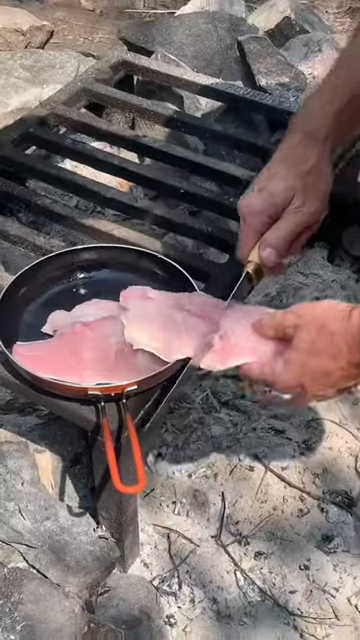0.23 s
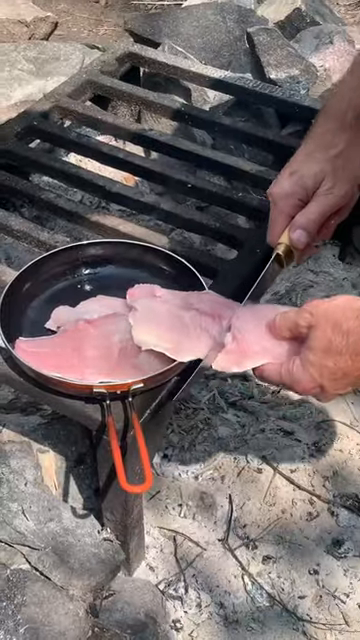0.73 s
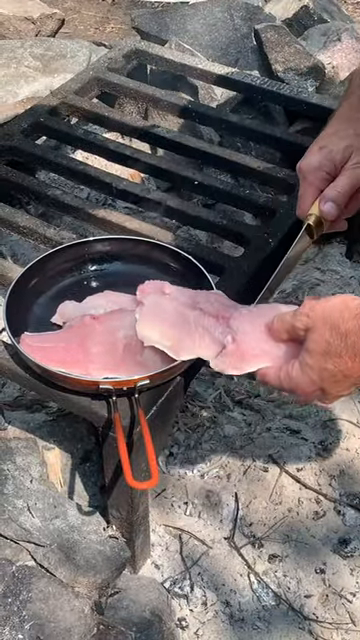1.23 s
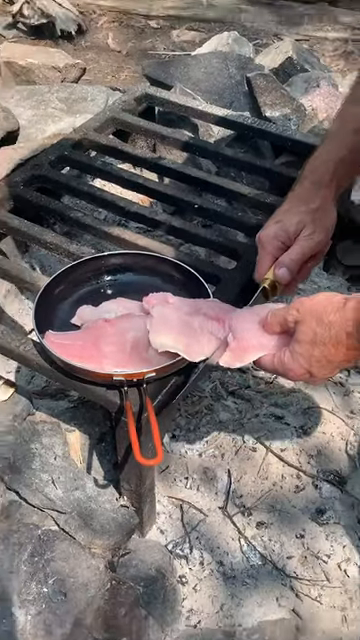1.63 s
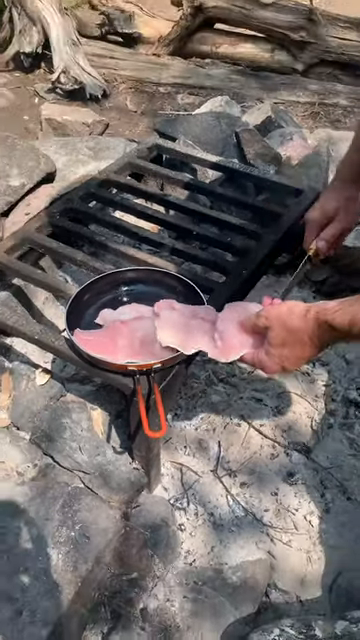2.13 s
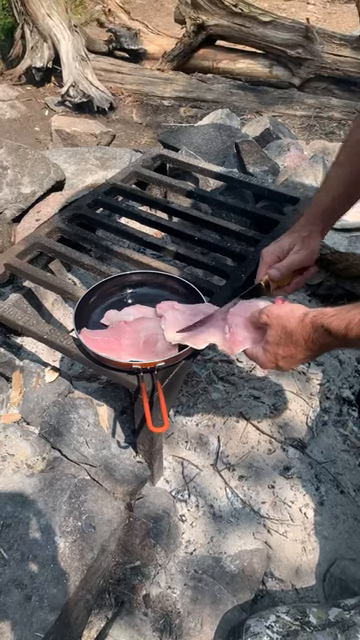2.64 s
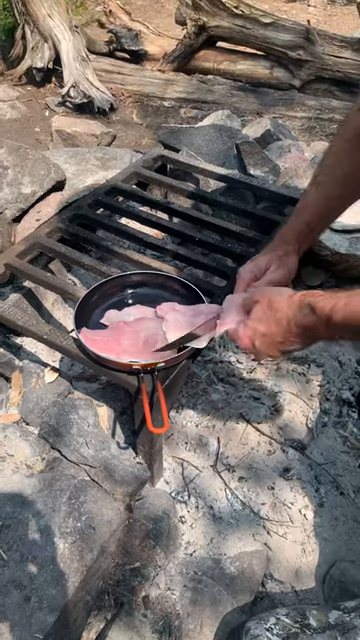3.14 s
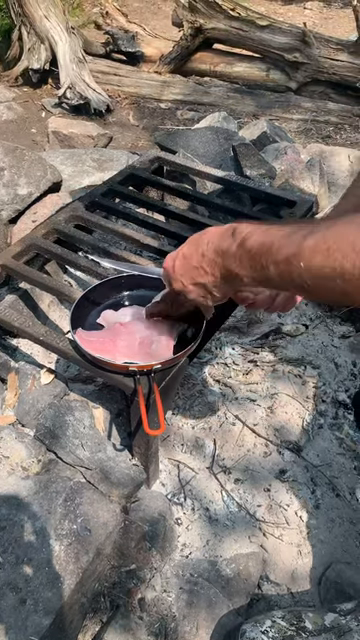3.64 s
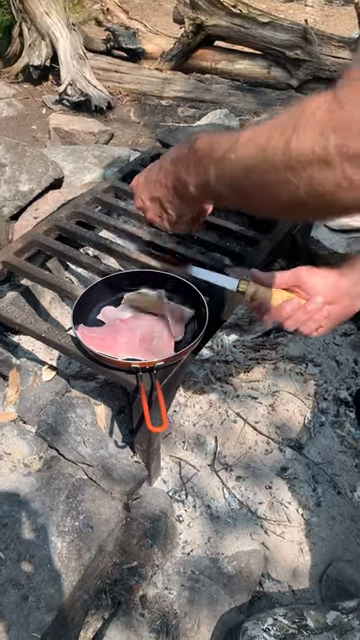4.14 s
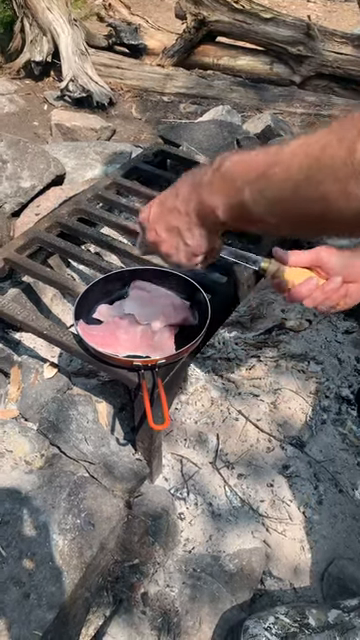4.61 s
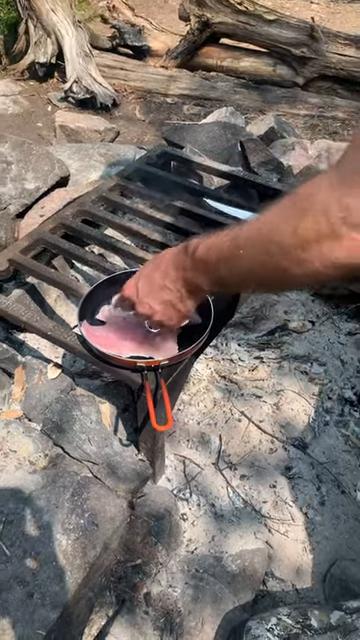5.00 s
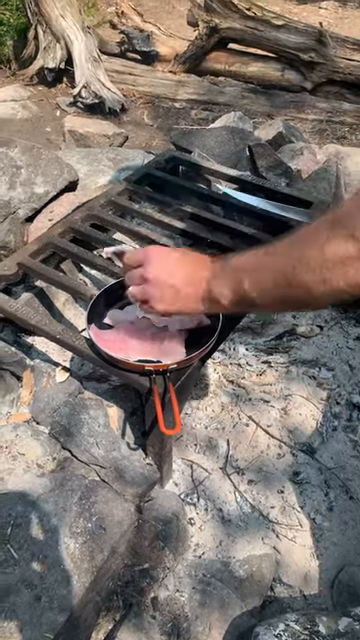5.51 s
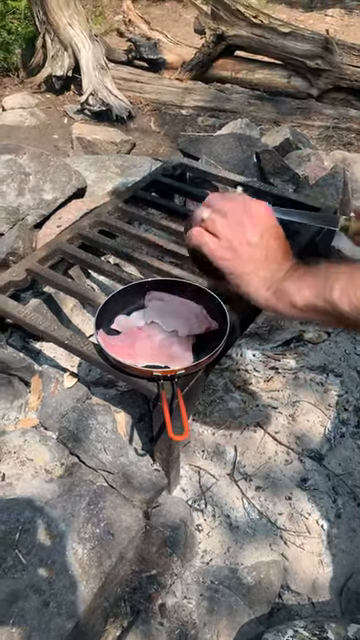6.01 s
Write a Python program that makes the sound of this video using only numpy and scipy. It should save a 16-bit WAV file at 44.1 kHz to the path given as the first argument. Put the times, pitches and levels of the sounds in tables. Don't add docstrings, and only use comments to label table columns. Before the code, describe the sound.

A split second of windy water lapping, then a metal pan clanks and rings on an iron grate while songbirds whistle among trees.

```python
import sys
import numpy as np
from scipy import signal
from scipy.fft import rfft, irfft, next_fast_len
from scipy.io import wavfile
from scipy.ndimage import uniform_filter1d, map_coordinates

SR = 44100
rng = np.random.default_rng(int(sys.argv[2]) if len(sys.argv) > 2 else 0)


def log_audio(samples):
    frames = np.atleast_2d(samples).T
    limited = np.clip(frames, -1, 1)
    pcm = np.round(limited * 32767).astype(np.int16)
    wavfile.write(sys.argv[1], SR, pcm)


def voltage_ratio(level):
    return 10 ** (np.asarray(level, float) / 20)


N = 276066


def unit(x):
    return x / np.sqrt(np.mean(x ** 2) + 1e-20)


def along(points, hz):
    f, v = np.transpose(points)
    return np.interp(np.log(hz + 1), np.log(f + 1), v)


def wobble(rate, count=N):
    knots = rng.standard_normal(int(count * rate / SR) + 4)
    return map_coordinates(knots, [np.arange(count) * rate / SR])


def filtered(x, response):
    m = next_fast_len(x.shape[-1] + 4096)
    return irfft(rfft(x, m) * response(np.fft.rfftfreq(m, 1 / SR)), m)[..., :x.shape[-1]]


def noise(spectrum, patchy_db):
    z = signal.stft(rng.standard_normal(N), nperseg=512)[2]
    field = uniform_filter1d(rng.standard_normal(z.shape), size=6, axis=0)
    field = uniform_filter1d(field, size=12, axis=1)
    patched = signal.istft(z * voltage_ratio(patchy_db * unit(field)), nperseg=512)[1][:N]
    return unit(filtered(patched, lambda hz: voltage_ratio(along(spectrum, hz))))


def add(track, s, sound):
    part = track[max(round(s * SR), 0):][:len(sound)]
    part += sound[:len(part)]


def held(start, hold, rise, fall):
    t = np.arange(N) / SR - start
    return np.minimum(rise * t, 0) - fall * np.maximum(t - hold, 0)


def swell(s, db, hz, length):
    t = np.arange(N) / SR - s
    return voltage_ratio(db) * np.sin(np.pi * np.clip(t / length, 0, 1)) * np.sin(2 * np.pi * hz * t)


def ringing(modes, t, scatter_db, tremble_db=0):
    total = 0
    for k, (hz, db, t60) in enumerate(modes):
        level_db = db + scatter_db * rng.standard_normal() - 60 * t / t60
        level_db = level_db + tremble_db * wobble(54.7, count=len(t))
        total = total + (-1) ** k * voltage_ratio(level_db) * np.sin(2 * np.pi * hz * t)
    return total


def echoes(x, t60, wet_db):
    t = np.arange(SR) / SR
    tail = rng.standard_normal(SR) * voltage_ratio(2.3 * wobble(156.3, count=SR) - 60 * t / t60) * (t > .004)
    return x + voltage_ratio(wet_db) * signal.fftconvolve(x, tail / np.linalg.norm(tail))[:len(x)]


def knocks():
    # start_s, level_db, softness_hz, thud_db, pitch_factor
    blows = [(0.495, -36, 876, -3, 0.9), (1.34, -32.5, 1500, -35, 1.34), (1.3448, -18, 2600, -26, 1.28),
             (1.3493, -15, 3700, -21.5, 0.96), (1.371, -28.5, 1480, -8.5, 0.92),
             (1.377, -26.5, 1490, -19, 1.05), (1.636, -21, 1750, -7.5, 1.01),
             (1.668, -31, 1150, -22.5, 0.87), (1.983, -35.5, 1460, -4, 0.92), (1.994, -38, 1470, -5, 0.95),
             (2.137, -44, 1500, -30.5, 1.9), (2.1448, -18, 2720, -27, 0.94),
             (2.1495, -16.5, 3570, -39, 0.95), (2.1534, -22, 2980, -25, 0.972),
             (2.179, -45.5, 1500, 7.5, 0.97), (2.933, -41.5, 700, -7, 1.03),
             (4.1934, -14, 1870, -20.5, 1.11), (4.1977, -17.5, 3200, -52, 1.11),
             (4.2, -24.5, 2500, -33.5, 0.94), (4.215, -48, 2490, -15, 1.2)]
    # pitch_hz, level_db, t60_s
    contact = [(270, -25.5, 0.31), (541, -8, 0.059), (777, -1, 0.078), (890, -3, 0.011), (1147, -4, 0.035),
               (1483, -14.5, 0.062), (1879, -13, 0.039), (2520, -17, 0.04), (3100, -15.5, 0.035),
               (5800, -7.5, 0.04)]
    thud_hz, shudder_hz, shudder_t60 = 205, 364, 0.21
    out, t = np.zeros(N), np.arange(SR // 4) / SR
    for s, db, soft_hz, thud_db, factor in blows:
        grit = filtered(rng.standard_normal(len(t)), lambda f: 1j * f / (220 + 1j * f))
        grit = .6 * voltage_ratio(-60 * t / .035) * grit
        clank = ringing(contact, factor * t, scatter_db=0) + grit
        clank = clank * (0.07 + np.exp(-(t / 0.0095) ** 3))
        thud = voltage_ratio(thud_db - 60 * t / 0.12) * np.sin(2 * np.pi * thud_hz * t) * (1 - np.exp(-t / 0.0056))
        shudder = filtered(rng.standard_normal(len(t)), lambda f: 1j * f * shudder_hz
                           / (shudder_hz ** 2 - f * f + 1j * f * shudder_hz))
        shudder = voltage_ratio(-21.5 - 60 * t / shudder_t60) * unit(shudder) * (1 - np.exp(-t / 0.0025))
        blow = filtered(clank + thud + shudder, lambda f: 1 / (1 + 1j * f / soft_hz) ** 2)
        add(out, s, voltage_ratio(db + 2.0) * blow)
    return out


def pan():
    # start_s, level_db, pitch_hz, length_s
    booms = [
        (1.3445, -21, 1522, .007),
        (4.196, -14, 726, 0.0107),
        (2.146, -16.5, 706, .014),
    ]
    # start_s, level_db, damping_factor, gripped_s
    rings = [
        (1.354, -26, 1.02, 1.75),
        (1.637, -41.5, 1.7, 2.2),
        (2.15, -24.5, 0.99, 3.3),
        (4.198, -29, 0.65, 5.02),
    ]
    mode_hz = [452, 549, 606, 614, 689, 765, 799, 1087, 1244, 1430, 1556, 1630, 1922, 2598]
    mode_t60 = [0.27, 0.38, 0.2, 3.36, 0.25, 0.2, 0.25, .09, 0.25, 0.17, 0.3, 0.41, 0.16, .15]
    struck_rim = [-23, -13, -28, -29, -34, -2, 1.5, -17.5, -10.5, -26, -23, -27, -26.5, -45]
    struck_base = [-20, -17.5, -8, -28, -18, -2.5, -9.5, -11, -9, -30, -12.5, -21.5, -22, -40]
    struck_wall = [-43, -25, -31.5, -32.5, -22, -6, -12, -16.5, -4.5, -14, -12, -22, -16.5, -34]
    out = knocks() + sum(swell(*boom) for boom in booms)
    t = np.arange(6 * SR // 5) / SR
    places = [struck_rim, struck_rim, struck_base, struck_wall]
    for (s, db, damping, until), struck in zip(rings, places):
        modes = zip(mode_hz, db + np.array(struck), np.divide(mode_t60, damping))
        free = (1 - np.exp(-(t / .018) ** 3)) * voltage_ratio(-300 * np.maximum(t + s - until, 0))
        add(out, s, free * ringing(modes, t, scatter_db=1.0, tremble_db=4.5))
    return echoes(out, t60=0.11, wet_db=-14.0)


def knife():
    # start_s, peak_db, centre_hz, t60_s
    ticks = [(0.4232, -42.5, 6330, 0.03), (0.533, -49, 6190, 0.018), (1.2665, -64, 10200, 0.025),
             (1.3452, -29, 3200, 0.023), (1.3519, -26, 3260, 0.066), (1.805, -38.5, 10200, 0.05),
             (1.8584, -47, 10300, 0.021), (1.9122, -63, 10400, 0.011), (1.315, -39.5, 6450, 0.023),
             (1.9558, -52, 10500, .02), (1.9694, -29.5, 10500, 0.023), (1.984, -36, 5500, .02),
             (2.004, -43, 10500, 0.02), (2.186, -40, 12300, .015), (2.1488, -23, 2520, 0.032),
             (2.299, -34.5, 10700, 0.026), (2.728, -42, 6500, 0.028), (2.7773, -33.5, 6400, 0.075),
             (3.164, -45, 6600, 0.013), (3.167, -45.5, 14500, 0.027), (3.911, -42, 10400, 0.016),
             (4.1853, -6.5, 10600, 0.0075), (4.1978, -20, 3080, 0.013), (4.311, -40, 10700, 0.037),
             (4.3547, -26.5, 6760, 0.012), (4.3568, -20, 10500, 0.018), (4.479, -39, 9800, 0.036),
             (4.7473, -26.5, 11800, 0.062), (4.765, -31.5, 12000, 0.075), (4.815, -39, 10400, 0.042),
             (5.2601, -42, 10300, 0.02), (5.3701, -28.5, 10900, 0.075), (5.4905, -32, 10300, 0.061),
             (5.6286, -21.5, 9200, 0.066), (5.867, -38, 10050, 0.027), (6.059, -31, 10000, 0.042)]
    # frequency_hz, level_db
    edge = [(500, -89), (1200, -6.5), (2200, -18.5), (4000, -2.5), (7000, -2.5), (10500, 2.5),
            (13000, -12.5), (15500, -5.5), (16500, -26)]
    # start_s, level_db,
    # pitch_hz, t60_s
    pings = [(1.997, -41, 6150, .05), (2.004, -36, 6040, .03), (4.356, -41, 850, 0.021),
             (4.357, -30, 6700, .015), (1.347, -32, 271, 0.056), (6.253, -31, 109.3, 0.059),
             (1.6377, -32.5, 2580, 0.029), (1.3457, -29, 1080, 0.024), (1.351, -19, 1770, 0.032),
             (1.965, -49, 2410, 0.14), (2.148, -28, 990, 0.035), (2.149, -19.5, 1780, 0.045),
             (4.185, -15, 3050, 0.012), (4.197, -22.5, 3100, 0.029), (4.2015, -19.5, 1475, 0.044),
             (4.215, -30, 1490, 0.032), (4.357, -43.5, 1290, 0.033), (4.356, -38, 1550, 0.028),
             (5.005, -54.5, 477, 0.11), (6.249, -21, 76, 0.9), (3.9332, -32, 2730, 0.0074),
             (3.9328, -42, 4100, 0.013), (4.0132, -35, 6240, 0.0096), (4.014, -48, 4000, 0.084),
             (4.048, -48, 4100, 0.06), (4.1851, -0.5, 4280, 0.0038), (4.187, -16.5, 2520, 0.028),
             (4.356, -26.5, 2240, 0.005), (4.7473, -39, 1510, 0.018), (4.7478, -46, 2230, 0.016),
             (5.3697, -48.5, 2270, 0.027), (5.6283, -46, 2060, 0.02), (5.6316, -49, 1140, 0.022)]
    # start_s, hold_s, level_db, fade_s
    scrapes = [
        (1.958, 0.013, -44.5, 0.01),
        (1.983, 0.027, -43.5, .012),
        (3.911, 0.15, -55.5, .025),
        (4.166, 0.0018, -47, 0.0092),
        (4.187, 0.0034, -24.5, 0.012),
        (4.196, 0.082, -50.5, 0.11),
        (4.361, 0.0025, -49.5, 0.23),
    ]
    # frequency_hz, level_db per Hz
    rasp = [(300, -22), (1500, -5.5), (5000, 3.5), (7000, -8), (10000, 3), (13000, -8.5), (15700, 0.5),
            (16000, -44)]
    longest_tail_t60 = .045
    out, t = np.zeros(N), np.arange(SR // 10) / SR
    for s, db, hz, t60 in ticks:
        onset = t / 0.00078 * np.exp(1 - t / 0.00031)
        tail = 0.32 * voltage_ratio(-60 * t / min(t60, longest_tail_t60)) * (1 - np.exp(-t / 0.0004))
        snap = rng.standard_normal(len(t)) * (onset + tail)
        snap = filtered(snap, lambda f: voltage_ratio(along(edge, f)) * (
            .5 + 1j * f * .5 * hz / (hz * hz - f * f + 1j * f * .5 * hz)))
        add(out, s, voltage_ratio(db + 5.0) * snap / np.abs(snap).max())
    for s, db, hz, t60 in pings:
        add(out, s, (1 - np.exp(-t / 0.0002)) * ringing([(hz, db, t60)], t, scatter_db=1.5))
    stroke = sum(voltage_ratio(db + held(s, hold, 1600, 30 / fade)) for s, hold, db, fade in scrapes)
    scraping = stroke * voltage_ratio(2.23 * wobble(300)) * noise(rasp, patchy_db=3.5)
    return echoes(out, t60=0.31, wet_db=-21.5) + scraping


def whistle(s, hz, db, flutter_db, waver):
    t = np.arange(round((s[-1] - s[0]) * SR)) / SR + s[0]
    pitch = uniform_filter1d(np.interp(t, s, hz), size=300)
    pitch = pitch * (1 + waver * wobble(172.4, count=len(t)))
    level_db = np.interp(t, s, db) + flutter_db * wobble(169.5, count=len(t))
    tone = voltage_ratio(level_db) * np.sin(2 * np.pi * np.cumsum(pitch) / SR)
    leaves = rng.standard_normal(SR // 20) * voltage_ratio(-60 * np.arange(SR // 20) / SR / .03)
    leaves[0] = 3.8 * np.linalg.norm(leaves)
    return signal.fftconvolve(tone, leaves / np.linalg.norm(leaves))


def hazy(note, t60, wet_db):
    t = np.arange(SR // 2) / SR
    tail = rng.standard_normal(len(t)) * voltage_ratio(3 * wobble(181, count=len(t)) - 60 * t / t60)
    tail = tail * (1 - np.exp(-t / 0.0029))
    tail = voltage_ratio(wet_db) * tail / np.linalg.norm(tail)
    return signal.fftconvolve(note, np.r_[1, tail[1:]])


def song(notes, shape, bend, t60, wet_db, contour_db, waver=.014):
    out, share = np.zeros(N), np.array([0, .12, bend, .9, 1])
    for s, length, hz, db in notes:
        pitch = hz * np.interp(share, [0, bend, 1], shape)
        note = whistle(length * share, pitch, db + np.array(contour_db), 1.6, waver)
        add(out, s, hazy(note, t60, wet_db))
    return out


def hooks():
    # time_s, pitch_hz, level_db
    hook = [(0, 6250, -23), (0.015, 6200, -1), (0.019, 5430, 1), (.028, 4280, -5.5), (.036, 4330, -2),
            (.043, 5500, -7), (0.069, 5020, 3), (.082, 4960, 0.5), (.095, 4800, -37)]
    # start_s, level_db, pitch_factor
    repeats = [
        (0.162, -43.5, 0.98),
        (.285, -40.5, 0.99),
        (0.413, -37.5, 1.026),
        (.535, -36.5, 1.024),
        (0.667, -36.5, 1),
    ]
    out = np.zeros(N)
    s, hz, db = np.transpose(hook)
    for start, level_db, factor in repeats:
        note = whistle(s, factor * hz, db + level_db, flutter_db=3.2, waver=.014)
        add(out, start - .008, hazy(note, t60=0.26, wet_db=3.5))
    return out


def birds():
    dip, drop = (1.33, 1, 1.65), (1.6, 1.27, 1)
    slide, lift, leap = (1.15, 1, .77), (.96, 1, 1.02), (.83, 1, 1.18)
    sag, climb, steady = (1.2, 1.05, 1), (1, 1.14, 1.35), (.998, 1, 1.005)
    swelling, fading, biting = [-4, 4, 4.5, 4.5, -0.5], [-5.5, -1.5, 6, -1, -3.5], [-6, 6, -3.5, 1, -1.5]
    # start_s, length_s, pitch_hz, level_db
    dips = [
        (.785, 0.048, 3380, -43),
        (.885, 0.046, 3475, -46.5),
        (.99, 0.045, 3230, -50),
    ]
    drops = [
        (.83, 0.033, 3400, -43.5),
        (.93, 0.031, 3410, -49.5),
        (1.035, 0.03, 3480, -52.5),
    ]
    slides = [
        (2.67, 0.068, 5960, -58),
        (2.79, 0.12, 6160, -53.5),
        (2.937, 0.12, 6350, -46),
        (3.085, .11, 6400, -43.5),
        (3.232, 0.12, 6460, -41.5),
    ]
    lifts = [
        (3.379, 0.0803, 7480, -49),
        (3.558, 0.035, 4626, -48),
    ]
    turns = [
        [(3.575, .045, 6050, -47)],
        [(3.636, .03, 3400, -55)],
    ]
    tops = [
        (3.476, 0.036, 8050, -42),
        (3.615, 0.021, 6300, -55.5),
        (.612, .03, 9200, -66),
    ]
    sags = [(5.89, 0.029, 4950, -60), (6.08, 0.042, 4890, -60.5), (5.76, 0.034, 5460, -65.5),
            (5.1, 0.043, 4900, -64), (5.13, 0.049, 4170, -64.5), (5.26, 0.036, 4200, -59),
            (5.3, 0.027, 5550, -62), (5.39, 0.026, 4180, -55), (5.53, 0.039, 4090, -53.5),
            (5.665, 0.041, 3590, -58), (5.805, 0.028, 3760, -55.5), (5.965, 0.021, 3720, -56)]
    climbs = [
        (.6, 0.03, 5180, -62),
        (5.86, 0.033, 3780, -51),
        (6.025, 0.046, 3790, -53),
        (6.235, 0.02, 3660, -56),
    ]
    out = hooks()
    for notes, shape in [(dips, dip), (drops, drop)]:
        out += song(notes, shape, 0.51, t60=.24, wet_db=1.0, contour_db=biting)
    out += song(slides, slide, 0.62, t60=.31, wet_db=4.5, contour_db=fading)
    out += song(tops, steady, 0.31, t60=.31, wet_db=2.0, contour_db=swelling, waver=.006)
    for notes, shape in zip([lifts, *turns], [lift, leap, drop]):
        out += song(notes, shape, 0.93, t60=.31, wet_db=7.5, contour_db=swelling)
    for notes, shape in [(sags, sag), (climbs, climb)]:
        out += song(notes, shape, 0.47, t60=.24, wet_db=2.5, contour_db=swelling, waver=.02)
    return out


def puffs():
    # start_s, peak_db, hold_s
    gusts = [(0.56, -51.5, 0.11), (0.94, -58, .04), (1.163, -48, 0.035), (1.284, -31, 0.0092),
             (1.37, -40, .01), (1.376, -46.5, 0.17), (1.618, -40.5, 0.0084), (1.682, -57, 0.074),
             (1.907, -32.5, 0.005), (1.982, -39, 0.026), (2.048, -55, 0.048), (2.554, -56, 0.044),
             (2.938, -64, 0.034), (3.081, -55, 0.064), (3.203, -35, 0.014), (3.411, -35.5, .055),
             (3.65, -64, 0.066), (4.164, -39, 0.035), (4.245, -61.5, 0.037), (4.698, -57, 0.0041),
             (4.819, -54, 0.026), (4.927, -47.5, 0.011), (4.992, -51, 0.048), (5.205, -44.5, 0.031),
             (5.285, -39.5, 0.013), (5.526, -53.5, 0.031), (5.642, -57.5, 0.055), (6.147, -30, 0.0085),
             (6.224, -60, 0.0089), (6.241, -37, 0.0033)]
    # frequency_hz, level_db per Hz
    rumble_colour = [(15, -76), (30, -6), (42, -2.5), (55, -2), (90, -5), (140, -31), (250, -76)]
    # start_s, level_db, pitch_hz, length_s
    swing = (1.34, -30, 57.5, 0.05)
    rise, fall = 769, 698.5
    rumble = noise(rumble_colour, patchy_db=4.5)
    rumble = rumble / (np.abs(signal.hilbert(rumble)) + 1.5)
    level = voltage_ratio(-67.5 + 4.2 * wobble(11))
    level = level + sum(voltage_ratio(db + held(s, hold, rise, fall)) for s, db, hold in gusts)
    return level * unit(rumble) + swell(*swing)


def breeze_db():
    # time_s, level_db
    strength = [(.2, -63.5), (.65, -62.5), (1.1, -64), (1.5, -64.5), (2.2, -64), (2.7, -64.5), (3.7, -66),
                (4.4, -66), (5.3, -65.5), (6.26, -66)]
    s, db = np.transpose(strength)
    return np.interp(np.arange(N) / SR, s, db)


def breeze(gain_db, patchy_db):
    # frequency_hz, level_db per Hz
    colour = [(80, -1), (200, 0.5), (450, -0.5), (700, -6), (1200, -12.5), (2500, -15.5), (6000, -17.5),
              (15000, -77)]
    return voltage_ratio(breeze_db() + gain_db) * noise(colour, patchy_db)


def air():
    # frequency_hz, level_db per Hz
    hiss_colour = [(800, -22), (2000, -18.5), (3500, -6), (5000, 3.5), (6800, -3), (8700, 0), (9600, 3),
                   (10500, 10.5), (11500, -11.5), (12300, 1), (13200, -12.5), (15750, -7.5), (15950, -58)]
    strength_db = breeze_db()
    hiss_db = -56.5 + 0.046 * (strength_db - strength_db.mean()) + 0.52 * wobble(11)
    hiss = voltage_ratio(hiss_db) * noise(hiss_colour, patchy_db=2.4)
    return breeze(4.5 + 1.2 * wobble(31), patchy_db=1.6) + hiss + puffs()


def shore(cut_s):
    # frequency_hz, level_db per Hz
    surf = [(20, -6.5), (60, -3), (200, -8), (700, -22.5), (2000, -28.5), (5000, -28), (6500, -44),
            (10500, -57), (15700, -62), (16000, -110)]
    # start_s, level_db, pitch_hz
    bubbles = [
        (.004, -36, 1095),
        (.022, -58, 1770),
        (.056, -54, 930),
        (0.072, -39, 2710),
        (0.085, -34.5, 797),
        (0.091, -45, 1300),
    ]
    fade = np.clip(1 + (cut_s - np.arange(N) / SR) / 0.016, 0, 1)
    water = fade * voltage_ratio(-42.5 + 3 * wobble(88.0)) * noise(surf, patchy_db=-4.0)
    t = np.arange(SR // 20) / SR
    for s, db, hz in bubbles:
        envelope = voltage_ratio(db - 60 * t / 0.025) * (1 - np.exp(-t / 0.00037))
        add(water, s, envelope * np.sin(2 * np.pi * hz * t * (1 + 6 * t)))
    return water


def scene():
    cut_s, fade_in_s = 0.0916, 0.088
    fade = np.clip((np.arange(N) / SR - cut_s) / fade_in_s, .3, 1) ** 1.9 * voltage_ratio(-0.94)
    antiphase = breeze(1.1, patchy_db=0.5)
    camp = pan() + knife() + birds() + air() + antiphase * [[1], [-1]]
    return shore(cut_s) + fade * camp


def gated(x):
    # frequency_hz, level_db per bin
    quiet = [(2500, -110), (3500, -96.5), (4200, -90.5), (4750, -90), (5300, -93), (7000, -99.5),
             (8300, -91), (9000, -93.5), (9700, -99), (11000, -108), (12500, -101), (13300, -100),
             (13900, -100), (14800, -100), (16000, -101)]
    hz, s, z = signal.stft(np.array([x[0] + x[1], x[0] - x[1]]) / 2, SR, nperseg=1024)
    power = np.abs(z) ** 2
    around = uniform_filter1d(power.max(axis=0), size=40, axis=0) * voltage_ratio(-2 * 22)
    around = np.roll(around, shift=14, axis=0)
    band = uniform_filter1d(uniform_filter1d(power, size=8, axis=1), size=3, axis=2)
    high = hz[:, None]
    floor_db = along(quiet, hz)[:, None]
    dropped = (high > 2500) & (band < around + voltage_ratio(2 * floor_db) * (s > .16))
    dwarfed = (high > 4000) & (s > .16) & (band[0] < voltage_ratio(-2 * 10) * band[1])
    dropped[0] |= dwarfed & ((high > 8000) | (band[0] < voltage_ratio(2 * floor_db + 20)))
    treble = power[:, hz > 2500].sum(axis=(0, 1))
    dropped &= treble < 6 * np.roll(treble, shift=2)
    mid, side = signal.istft(z * ~dropped, nperseg=1024)[1][:, :N]
    return np.array([mid + side, mid - side])


def band_limit(x):
    return signal.sosfilt(signal.butter(12, 16680, fs=SR, output="sos"), x)


def record(dry):
    # frequency_hz, phase_rad
    ports = [(0, -.33), (300, -.4), (800, -.65), (1200, -.4), (1600, 0), (2400, 1), (3300, 1), (4700, 3.14),
             (6950, 6.28), (8950, 9.42), (11200, 12.57), (13250, 15.71), (15300, 18.85), (17000, 21.5)]
    # frequency_hz, level_db
    lean = [(60, -1), (110, 1), (200, 0), (380, -0.5), (700, -1), (1290, -2.5), (2380, -2.5), (4400, 3),
            (8120, -1), (15000, 0.5)]
    half = np.array([[1], [-1]]) / 2

    def port(hz):
        turn = np.exp(1j * half * np.interp(hz, *np.transpose(ports)))
        return turn * voltage_ratio(half * along(lean, hz)) * (hz < 16600)

    mix = np.clip(gated(filtered(dry, port)), -1, 1)
    return band_limit(mix)


dry = scene()
out = record(dry)
log_audio(out)
```